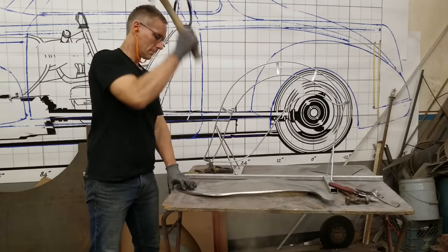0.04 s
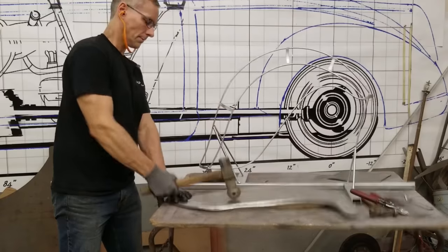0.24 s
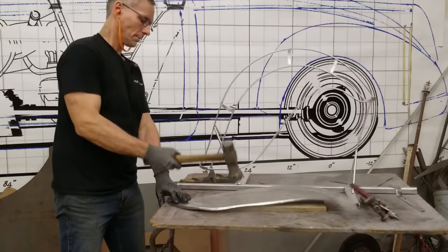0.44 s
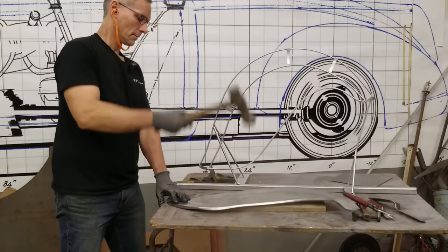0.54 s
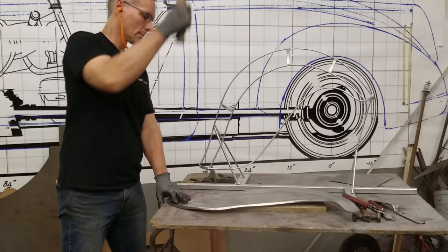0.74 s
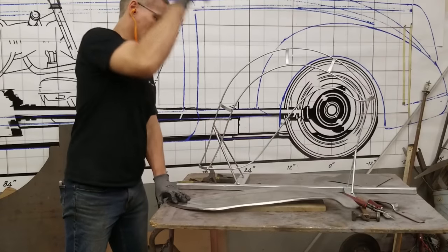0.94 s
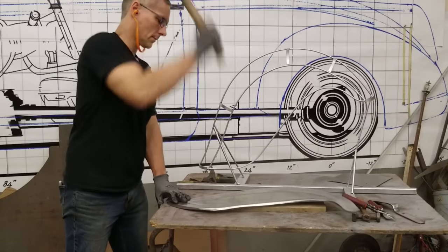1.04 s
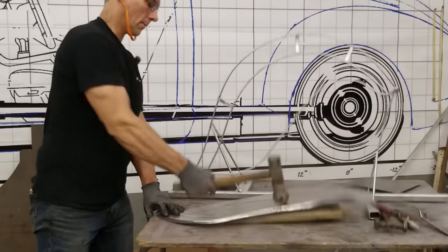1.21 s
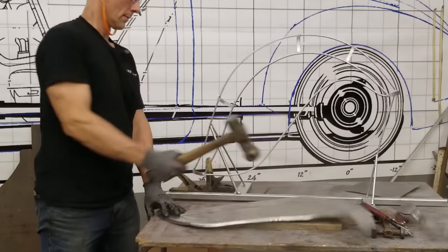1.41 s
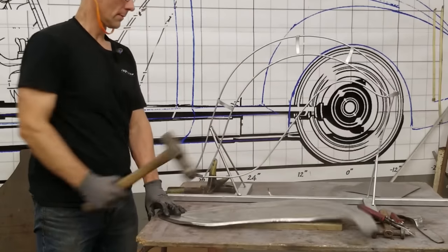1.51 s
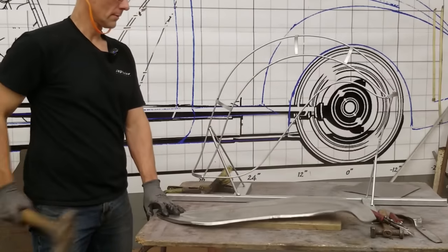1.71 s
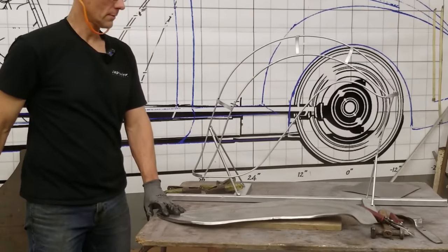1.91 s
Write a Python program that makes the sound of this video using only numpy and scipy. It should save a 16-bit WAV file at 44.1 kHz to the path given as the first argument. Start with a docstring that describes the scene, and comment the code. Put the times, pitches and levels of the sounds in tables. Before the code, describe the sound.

Two loud, clipped metal bangs, each followed by panel chatter, table knocks and small clinks

```python
"""A mallet bangs a sheet-metal fender about once a second; the panel rings densely, slaps down and chatters.
Under it a steel worktable rings, knocks on its legs and thuds on the floor; loose tools clink, and the shop hums.
The place is a large workshop, with the microphone near enough that the blows overload its input.
Contacts are impulses, often softened; they drive resonators or decaying noise that stands for dense modes.
The input flattens the peaks, the gain ducks, and a bass cut follows."""
import sys
import numpy as np
from scipy import signal
from scipy.io import wavfile

SR = 44100
rng = np.random.default_rng(int(sys.argv[2]) if len(sys.argv) > 2 else 0)


def voltage_ratio(decibels):
    """Convert decibels (scalar or array-like) to amplitude ratios, 20 dB per decade."""
    exponent = np.asarray(decibels, float) / 20
    return 10 ** exponent


def wav_out(sig):
    """Save sig, one row per channel (or a flat mono array), as 16-bit PCM at SR to the path in sys.argv[1]."""
    wavfile.write(sys.argv[1], SR, np.round(np.clip(np.atleast_2d(sig).T, -1, 1) * 32767).astype(np.int16))


N = 85995
LEAD = SR   # the time line starts one second early, to hold the blow before the start
TOTAL = LEAD + N


def at_hz(points, hz, column=1):
    """Reads a table column at any frequency, interpolated along log frequency."""
    points = np.array(points)
    return np.interp(np.log(hz), np.log(points[:, 0]), points[:, column])


def clicks(rows):
    """Puts one impulse on the time line for each (start_s, level_db) row."""
    out = np.zeros(TOTAL)
    for start_s, level_db in rows:
        out[LEAD + int(start_s * SR)] += voltage_ratio(level_db)
    return out


def soften(x, hz):
    """A soft contact: two one-pole low-passes."""
    r = np.exp(-2 * np.pi * hz / SR)
    return signal.lfilter([(1 - r) ** 2], [1, -2 * r, r * r], x)


def ring(x, modes):
    """Every impulse sets each (pitch_hz, level_db, t60_s) mode ringing as a decaying sine."""
    out = 0
    for pitch_hz, level_db, t60_s in modes:
        r = voltage_ratio(-60 / (t60_s * SR))
        w = 2 * np.pi * pitch_hz / SR
        resonator = [1, -2 * r * np.cos(w), r * r]
        out = out + signal.lfilter([0, voltage_ratio(level_db) * np.sin(w)], resonator, x + 1e-18)
    return out


def bands(length, level):
    """Sums third-octave bands of noise, each shaped by level(hz)."""
    edges = 40 * 2 ** np.arange(0, 8.8, 1 / 3)
    white = rng.standard_normal((2, length))   # neighbouring bands take different noise
    out = 0
    for k, (low, high) in enumerate(zip(edges, edges[1:])):
        band = signal.butter(2, [low, high], "band", fs=SR, output="sos")
        out = out + level(np.sqrt(low * high)) * signal.sosfilt(band, white[k % 2])
    return out


# steady noise of the shop, spectrum before its overall level is set: pitch_hz [Hz], level_db [dB per Hz]
SHOP_SPECTRUM = [(24, -31), (40, 7), (140, 18), (402, 13), (556, -30), (680, -64), (896, -35), (1180, -5),
                 (2570, -16), (16000, -86)]


def shop_hum():
    """The low steady noise of the shop: random noise shaped band by band."""
    hum = bands(TOTAL, lambda hz: voltage_ratio(at_hz(SHOP_SPECTRUM, hz)))
    return voltage_ratio(-44) * hum / hum.std()


# blows of the mallet, the first one before the start: start_s [s], level_db [dB]
BLOWS = [(-0.59, 6.5), (.2225, 9), (1.1729, 9)]
CONTACT_HZ = 1600   # the first touch is dull


def mallet_blows():
    """The bare force of the mallet: one impulse a blow."""
    return clicks(BLOWS)


def after_blows(per_s, level_db, t60_s, rise_s=0.00067, bend=0.89):
    """Random contacts of uneven size that follow every blow and die away; bend > 1 dies ever faster."""
    t = np.arange(TOTAL) / SR
    fade = (1 - np.exp(-t / rise_s)) * voltage_ratio(-60 * (t / t60_s) ** bend)
    shape = signal.fftconvolve(mallet_blows(), fade)[:TOTAL]
    sizes = voltage_ratio(3.42 * np.minimum(rng.exponential(1, TOTAL), 2.5))
    signs = rng.choice([-1, 1], TOTAL)
    happens = rng.random(TOTAL) < per_s / SR
    return voltage_ratio(level_db) * shape * sizes * signs * happens


def crash():
    """The panel slaps the table top right after a blow: a dense burst of bright contacts."""
    return soften(after_blows(per_s=600, level_db=-3, t60_s=0.07, rise_s=0.004), 7000)


def chatter():
    """The panel chatters: small soft contacts after each blow, dying away ever faster."""
    return soften(after_blows(per_s=200, level_db=-12, t60_s=0.78, bend=1.295), 3500)


# the crowd of panel modes and their echo in the shop:
# pitch_hz [Hz], level_db at the blow [dB], t60_s [s]
PANEL_DECAY = [(50, -54, 0.22), (78.6, 1.5, 0.35), (194, -6, 0.98), (324, -4, 1.176), (750, -6, 0.83),
               (1510, -9, 0.63), (2920, -10.5, 0.48), (5000, -10, 0.2), (9560, -18.5, 0.22),
               (15000, -25.5, 0.13)]


def panel(landing_touches):
    """Contacts excite modes so dense that each band dies away like noise; each blow finds other ones."""
    t = np.arange(2 * SR) / SR
    force = soften(mallet_blows(), CONTACT_HZ) + crash() + chatter()
    force = force + soften(voltage_ratio(-5) * landing_touches, 2600)

    def fading(hz):
        return voltage_ratio(at_hz(PANEL_DECAY, hz) - 60 * t / at_hz(PANEL_DECAY, hz, column=2))

    # new noise from just before each later blow
    cuts = [0] + [LEAD + int(start_s * SR) - 9 for start_s, _ in BLOWS[1:]] + [TOTAL]
    out = np.zeros(TOTAL)
    for begin, end in zip(cuts, cuts[1:]):
        response = bands(len(t), fading)
        part = np.zeros(TOTAL)
        part[begin:end] = force[begin:end]
        out = out + signal.fftconvolve(part, response)[:TOTAL]
    return out


# two close modes of the table frame: pitch_hz [Hz], level_db [dB], t60_s [s]
FRAME_MODES = [(105.8, -21, 1.52), (110.53, -21, 1.205)]


def table_frame():
    """Two close frame modes, struck in opposite phase, beat against each other."""
    return ring(mallet_blows(), FRAME_MODES[:1]) - ring(mallet_blows(), FRAME_MODES[1:])


# strongest modes of the table top: pitch_hz [Hz], level_db before the shove [dB], t60_s [s]
TABLE_TOP_MODES = [(240.7, -28.5, .3), (417.5, -38.5, .25), (525, -31, 0.19), (594, -38, 0.15)]


def table_top():
    """The top takes up each blow gradually and rings unevenly, driven by noise under a swelling shove."""
    rise_s, shake_s = 0.017, 0.15   # the shove builds up and goes on shaking the table
    up, down = np.exp(-1 / (rise_s * SR)), np.exp(-1 / (shake_s * SR))
    shove = signal.lfilter([1 - up], np.convolve([1, -up], [1, -down]), mallet_blows())
    return ring(shove * rng.standard_normal(TOTAL) * voltage_ratio(-26), TABLE_TOP_MODES)


# dull knocks of the rocking table: start_s [s], level_db before softening [dB]
LEG_KNOCKS = [(.164, -35), (.428, -4), (.516, -18), (.541, -9), (.562, -5), (.572, -13), (.593, -5),
              (.71, -12), (.769, -18.5), (.855, -14.5), (1.098, -33), (1.484, -3), (1.868, -31)]
# modes of each knock: pitch_hz [Hz], level_db [dB], t60_s [s]
KNOCK_MODES = [(219, -12.5, 0.22), (245, -18, 0.19), (294, -9.5, 0.094), (355, -15, 0.099),
               (507, -6, 0.046)]


def leg_knocks():
    """The legs knock on the floor, with smaller random knocks after each blow; all are soft contacts."""
    knocks = clicks(LEG_KNOCKS) + after_blows(per_s=70, level_db=-26.5, t60_s=2.18)
    return ring(soften(knocks, 900), KNOCK_MODES)


# modes of the mallet face: pitch_hz [Hz], level_db [dB], t60_s [s]
BANG_MODES = [(331, -1.5, 0.014), (662, 11.5, 0.0077), (1003, 4, 0.014)]


def mallet_bang():
    """The bang of the mallet face: a few very short modes set off by the dull touch, in inverted phase."""
    return -ring(soften(mallet_blows(), CONTACT_HZ), BANG_MODES)


# the table's feet drop back on the floor: start_s [s], level_db before softening [dB]
FOOT_THUDS = [(.29, -5.5), (1.335, -12)]
# modes of each thud: pitch_hz [Hz], level_db [dB], t60_s [s]
THUD_MODES = [(53.8, 8, 0.067), (81.3, 0, 0.089)]


def foot_thuds():
    """The feet drop back on the floor: very soft impulses ring two deep modes."""
    return ring(soften(clicks(FOOT_THUDS), 150), THUD_MODES)


# the panel and loose tools land again:
# start_s [s], level_db of the first touch on average [dB], centre_hz [Hz], slope_db [dB per octave]
LANDINGS = [(.426, -13, 3000, -11.5), (0.515, -28, 3000, -9), (.66, -47, 7000, -10), (1.387, -6, 1800, -9),
            (1.428, -16, 2700, -13), (1.505, -29.5, 5800, -16), (1.575, -47, 10340, -4),
            (1.9154, -24, 1700, -14), (1.942, -54, 1680, -4)]


def landings():
    """Each landing is five quick touches, heard as a short clack with a colour of its own."""
    spread_s, t60_s = 0.0073, 0.041
    t = np.arange(4000) / SR
    force, clack = np.zeros(TOTAL + SR), np.zeros(TOTAL + SR)
    for start_s, level_db, centre_hz, slope_db in LANDINGS:
        places = SR * spread_s * np.sort(rng.random(5)) ** 2
        sizes = voltage_ratio(level_db + rng.normal(0, 2, 5) - 3 * np.arange(5))   # each touch weaker on average
        touches = np.zeros(1000)
        touches[np.minimum(places, 999).astype(int)] = sizes * rng.choice([-1, 1], 5)

        def colour(hz):
            octaves = abs(np.log2(hz / centre_hz))
            return voltage_ratio(slope_db * octaves - 60 * t / t60_s)

        sound = signal.fftconvolve(touches, bands(len(t), colour))
        i = LEAD + int(start_s * SR)
        force[i:i + len(touches)] += touches
        clack[i:i + len(sound)] += sound
    return force[:TOTAL], clack[:TOTAL]


# loose tools on the table clink, each with one pitch: start_s [s], level_db [dB], pitch_hz [Hz], t60_s [s]
TOOL_CLINKS = [(.557, -20, 2230, .06), (.577, -26, 2050, .04), (.655, -42, 3980, .25),
               (1.427, -18, 2750, .07), (1.6, -44, 3450, .4)]


def clinks():
    """Each clink is a pair of close modes struck once."""
    out = 0
    for start_s, level_db, pitch_hz, t60_s in TOOL_CLINKS:
        pair = [(pitch_hz, 0, t60_s), (pitch_hz * 1.03, -4, t60_s)]
        out = out + ring(clicks([(start_s, level_db)]), pair)
    return out


def scene():
    """Adds all the sounds in the workshop and leaves out the early second."""
    landing_touches, landing_clacks = landings()
    fender = panel(landing_touches) + mallet_bang() + landing_clacks
    worktable = table_frame() + table_top() + leg_knocks() + foot_thuds()
    return (shop_hum() + fender + worktable + clinks())[None, LEAD:]


def overload(dry):
    """The input overloads into flat tops while the gain ducks under the loudest peaks and recovers."""
    ceiling, knee = 0.27, 8.0   # full scale 1; a higher knee bends more sharply
    share, release_db_per_s = 0.067, 28.5   # share of the overload taken off; release before that share
    over_db = np.maximum(20 * np.log10(np.abs(dry) / ceiling + 1e-9), 0)
    ramp = release_db_per_s * np.arange(N) / SR
    held_db = np.maximum.accumulate(over_db + ramp, axis=-1) - ramp   # peaks held, falling steadily
    duck = voltage_ratio(-share * soften(held_db, 700))
    return duck * dry / (1 + np.abs(dry / ceiling) ** knee) ** (1 / knee)


def band_limit(x):
    """A steep low-pass at the top of the band."""
    return signal.sosfilt(signal.butter(12, 16850, fs=SR, output="sos"), x)


def record(dry):
    """The microphone input overloads; the bass cut after it makes the flat tops sag, and hiss is added."""
    x = overload(dry)
    x = signal.sosfilt(signal.butter(1, 140, "high", fs=SR, output="sos"), x)   # bass cut
    x = signal.sosfilt(signal.butter(2, 61, "high", fs=SR, output="sos"), x)   # rumble cut
    x = x + voltage_ratio(-81.5) * rng.standard_normal(x.shape)   # self-noise of the microphone
    x = signal.sosfilt(signal.cheby2(10, 40, 16600, fs=SR, output="sos"), x)   # steep treble limit
    return band_limit(x)


dry = scene()
out = record(dry)
wav_out(out)
```